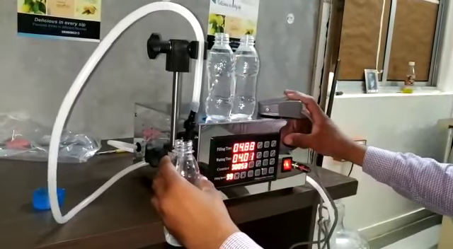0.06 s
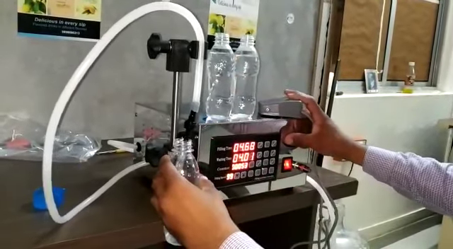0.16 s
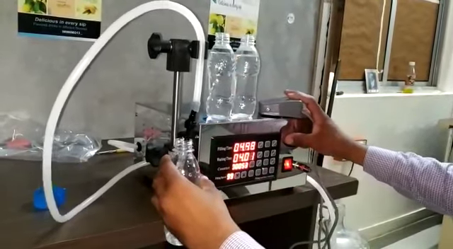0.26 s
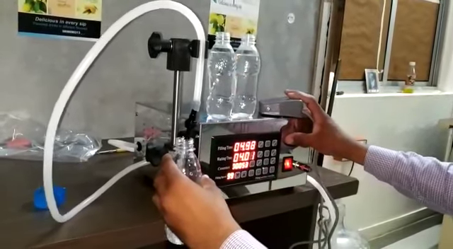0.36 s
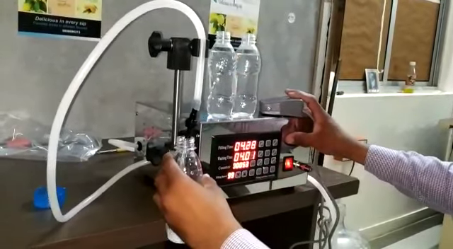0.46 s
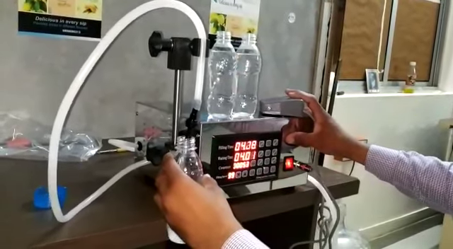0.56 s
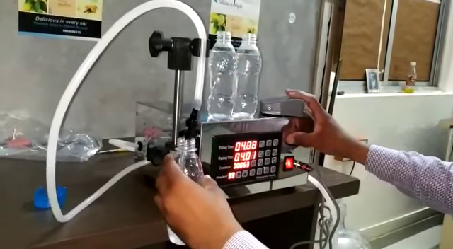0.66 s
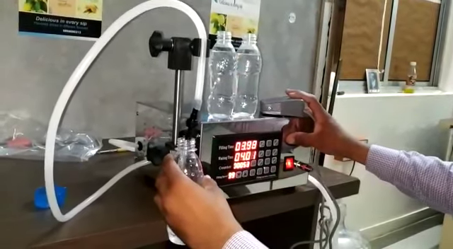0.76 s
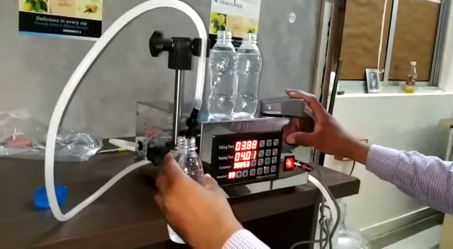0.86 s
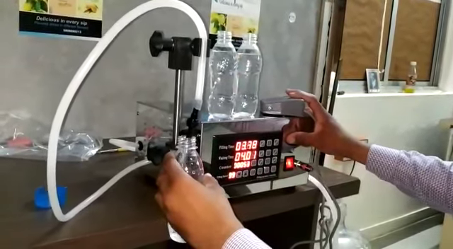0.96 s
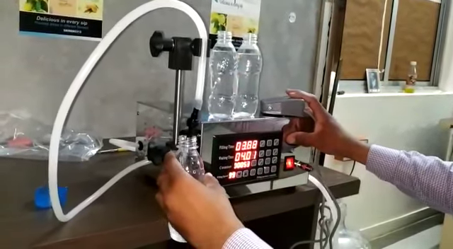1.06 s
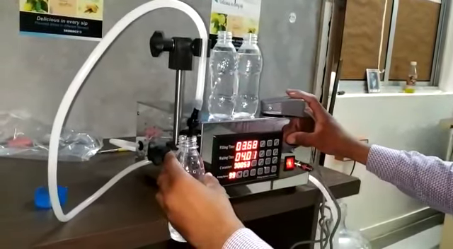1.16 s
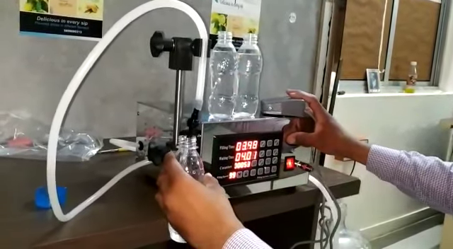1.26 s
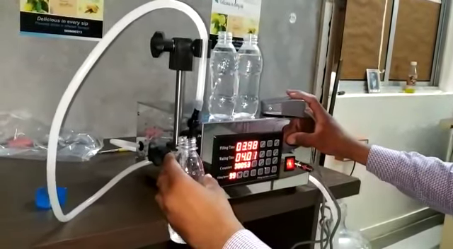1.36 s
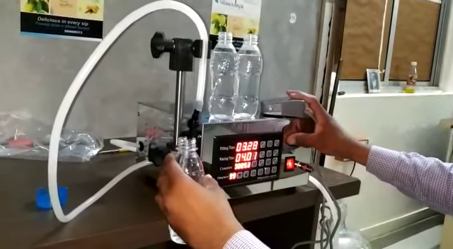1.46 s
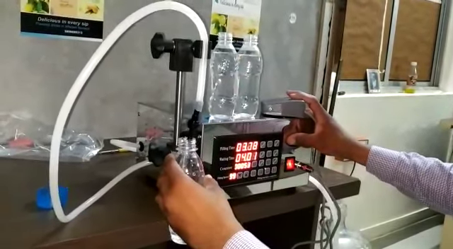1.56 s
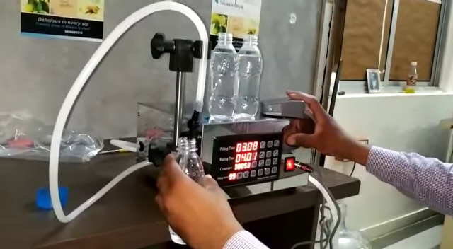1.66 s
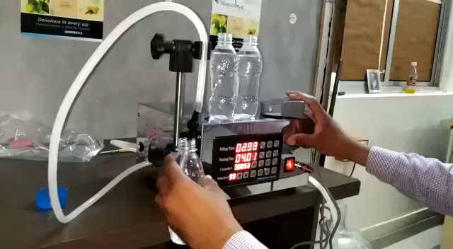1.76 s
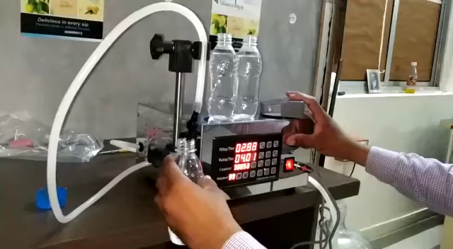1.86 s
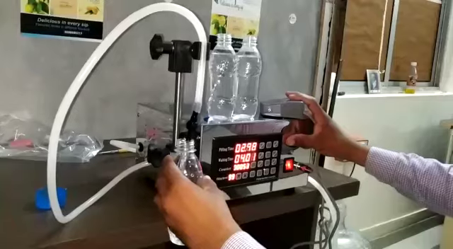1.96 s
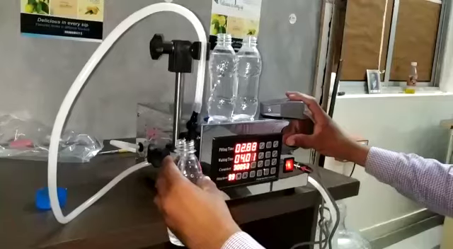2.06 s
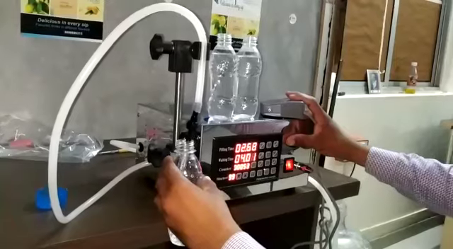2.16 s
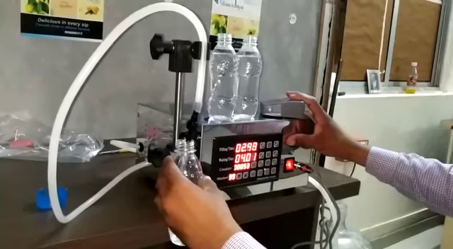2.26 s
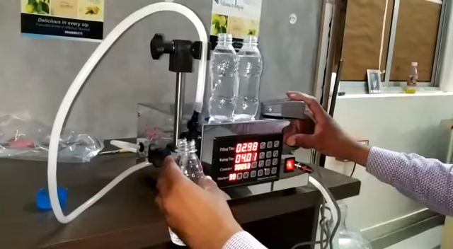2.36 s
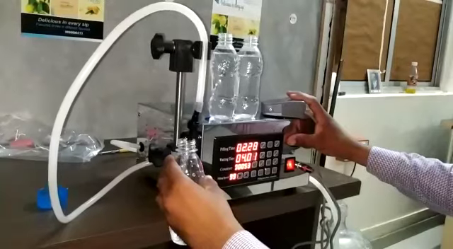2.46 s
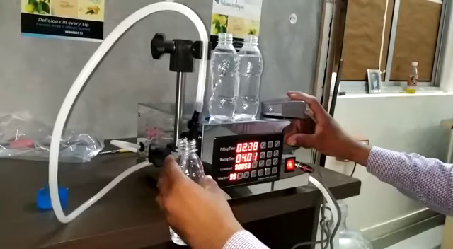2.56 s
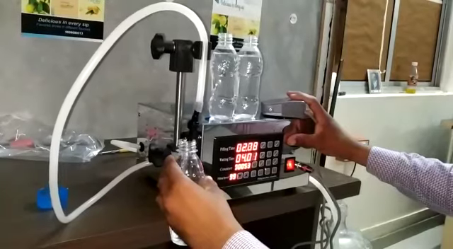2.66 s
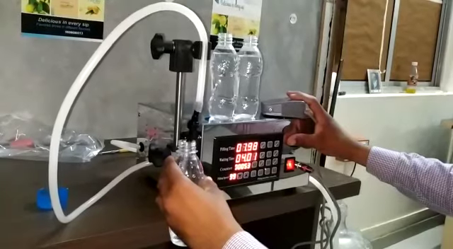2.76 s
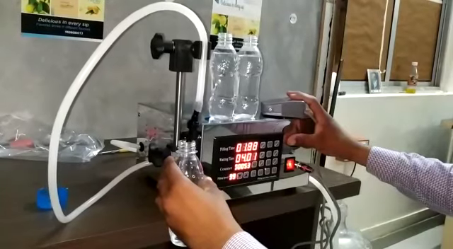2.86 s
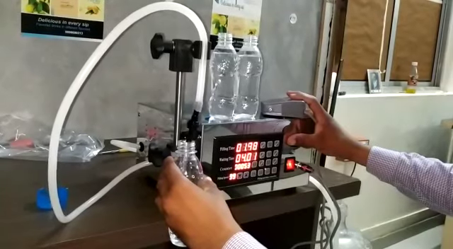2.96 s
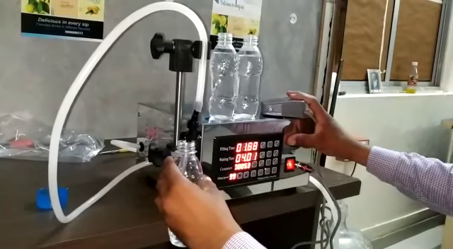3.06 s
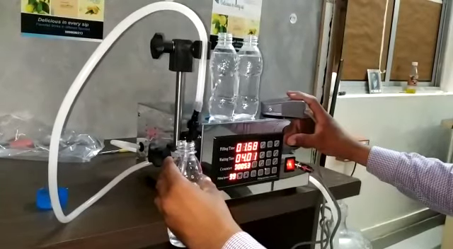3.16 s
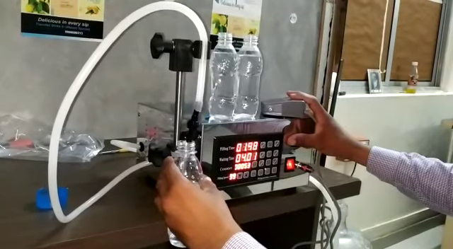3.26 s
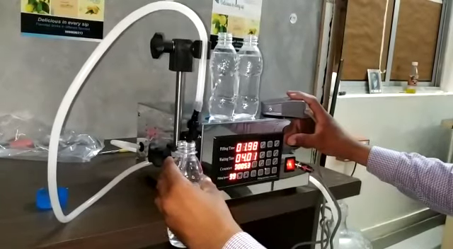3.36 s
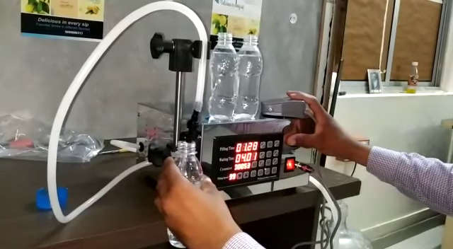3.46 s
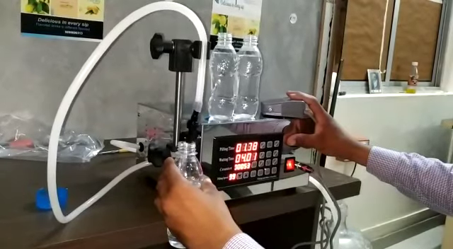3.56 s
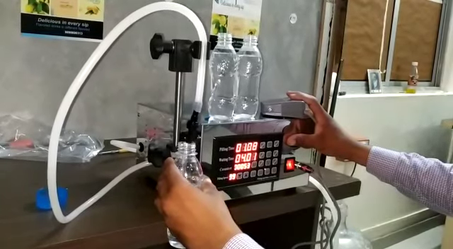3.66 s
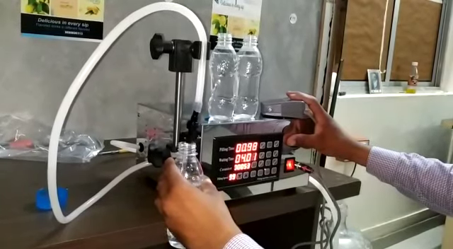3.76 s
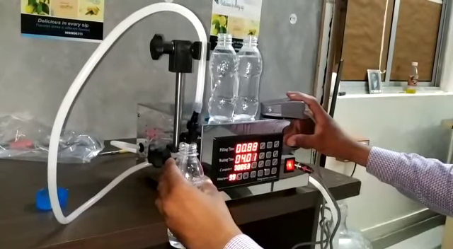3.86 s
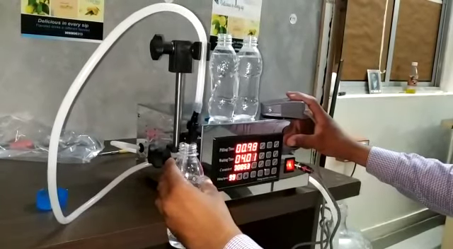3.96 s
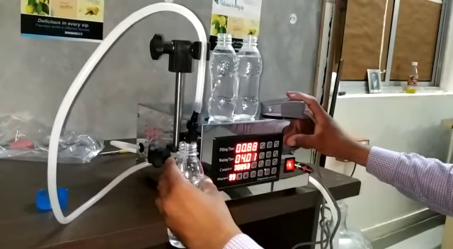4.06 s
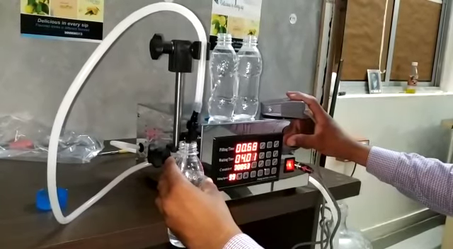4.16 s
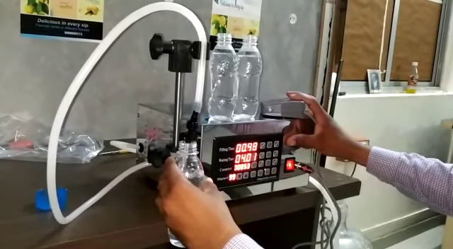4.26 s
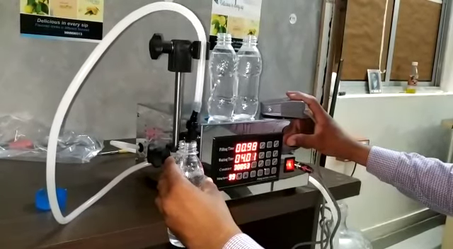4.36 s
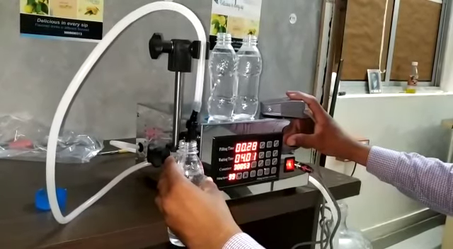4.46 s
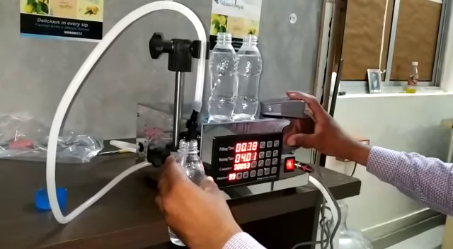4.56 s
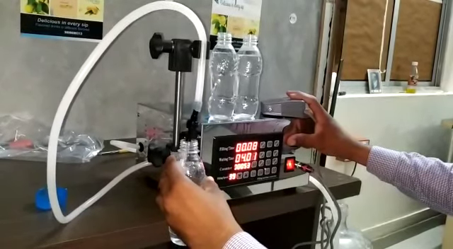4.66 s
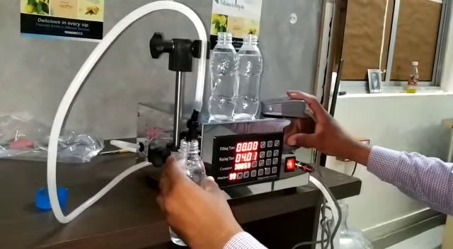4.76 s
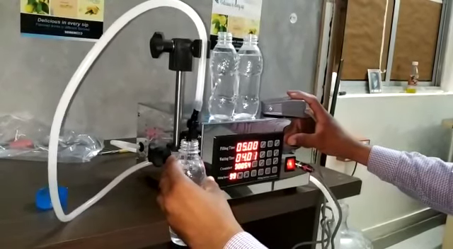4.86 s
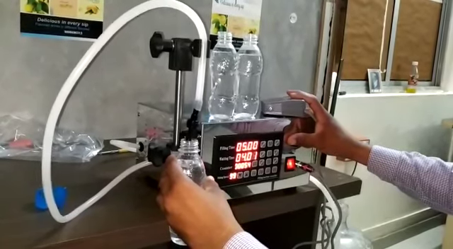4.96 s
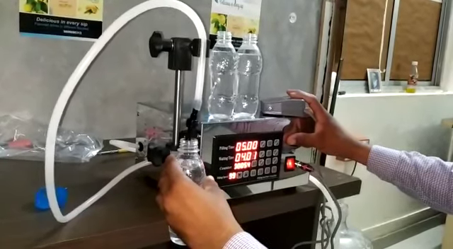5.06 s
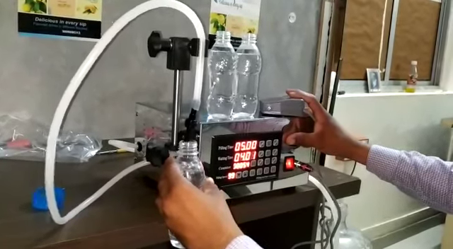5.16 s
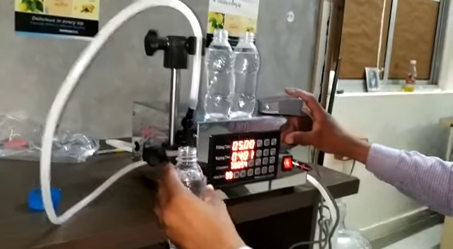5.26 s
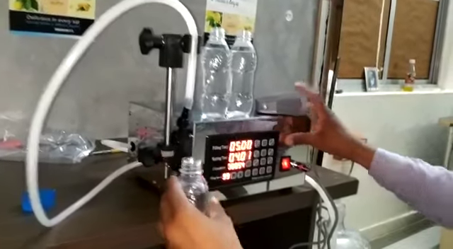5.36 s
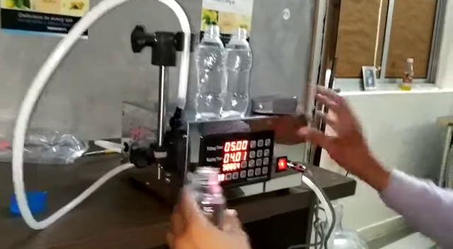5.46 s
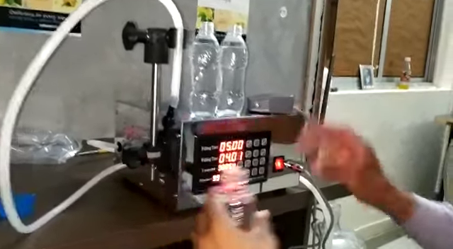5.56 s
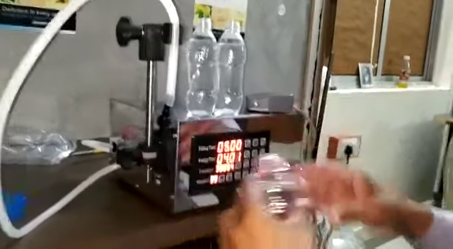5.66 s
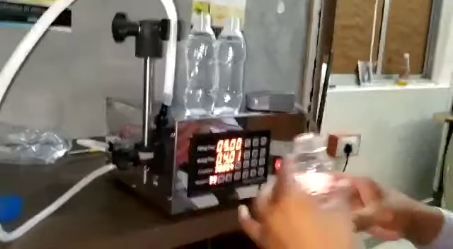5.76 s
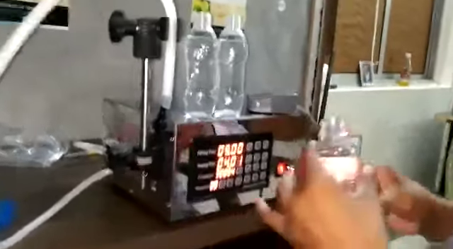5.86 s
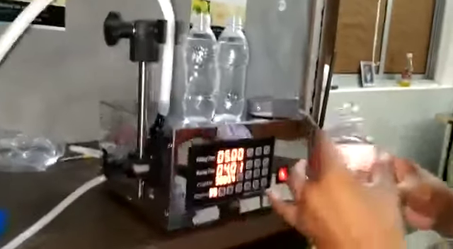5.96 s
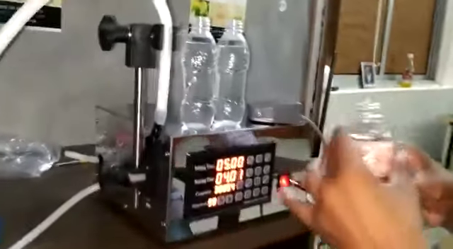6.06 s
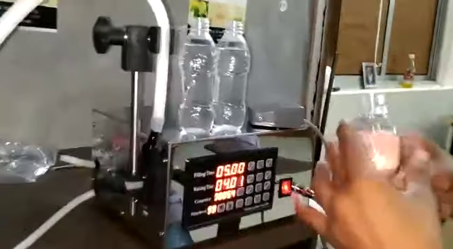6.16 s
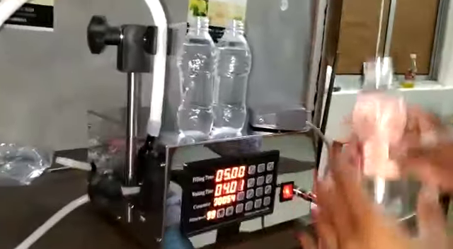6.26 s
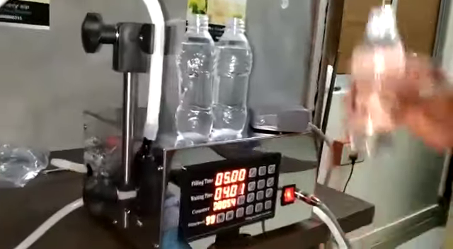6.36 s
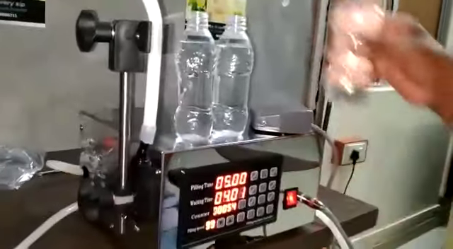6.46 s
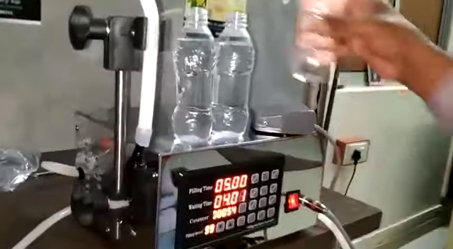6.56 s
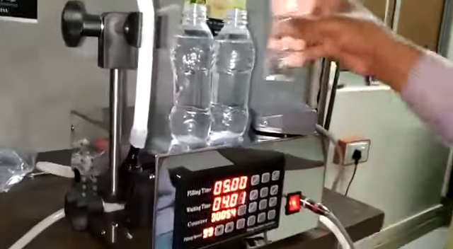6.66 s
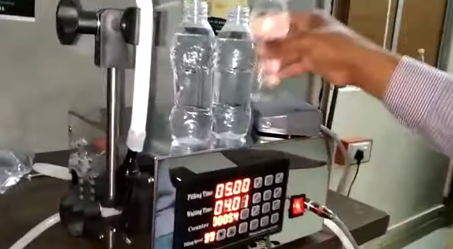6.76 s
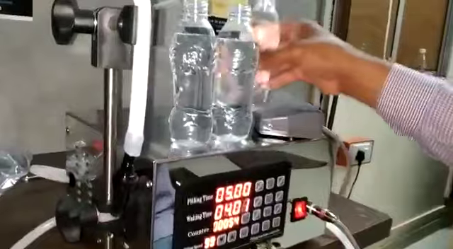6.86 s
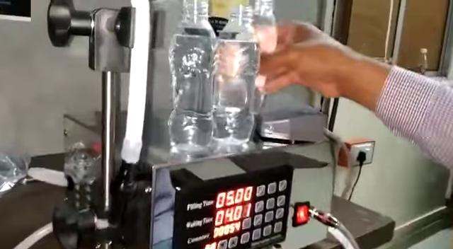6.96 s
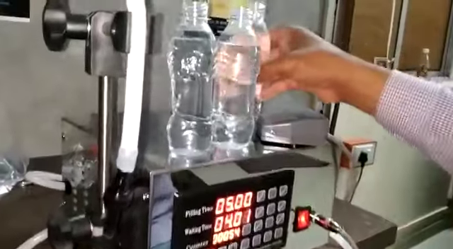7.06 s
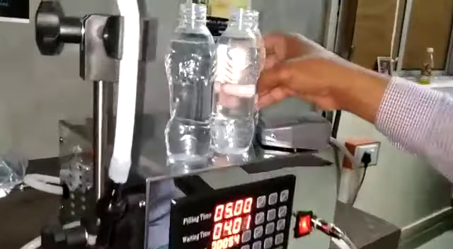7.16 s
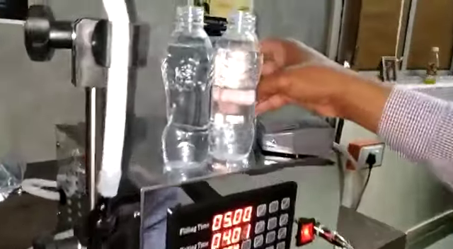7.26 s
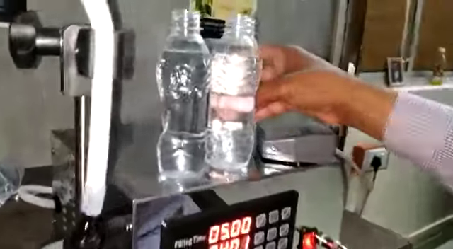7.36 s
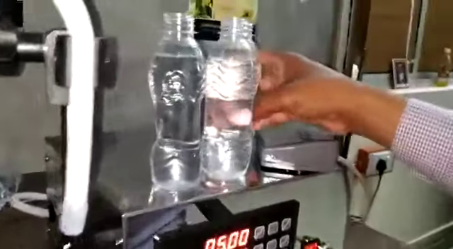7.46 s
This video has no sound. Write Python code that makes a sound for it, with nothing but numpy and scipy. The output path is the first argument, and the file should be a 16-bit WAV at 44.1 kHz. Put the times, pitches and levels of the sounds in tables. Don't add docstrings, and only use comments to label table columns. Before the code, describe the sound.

A small pump hums steadily with hissing spray as a plastic bottle fills, clicks off abruptly, then the bottle is set down with sharp knocks.

```python
import sys
import numpy as np
from scipy import signal
from scipy.fft import rfft, irfft
from scipy.io import wavfile
from scipy.ndimage import uniform_filter1d

SR = 44100
rng = np.random.default_rng(int(sys.argv[2]) if len(sys.argv) > 2 else 0)


def to_wav(s):
    ch = np.atleast_2d(s).T
    pcm = np.round(np.clip(ch, -1, 1) * 32767)
    wavfile.write(sys.argv[1], SR, pcm.astype(np.int16))


def invert_db(x):
    u = np.asarray(x, float) / 20
    return 10 ** u


N = 331632
TIME = np.arange(N) / SR

# time in seconds, speed in turns per second.
SHAFT_SPEED = [(0, 57.5), (.15, 58.9), (.5, 59.05), (1.2, 59.1), (1.6, 59.23), (2.8, 59.26), (3.4, 59.32),
               (4.8, 59.3), (5.3, 58.6)]
# order in cycles per turn, level in dB.
SHAFT_ORDERS = [(1, -17), (2, -11.5), (3, -4), (4, 2), (5, -12.5), (6, -7), (7, -20), (8, 0), (10, -22),
                (11, -19.5), (12, -15.5), (13, -19.5), (14, -14), (15, -17), (16, -16), (17, -24),
                (21, -27), (22, -22.5), (23, -26), (24, -21), (25, -23), (27, -21.5), (28, -28.5),
                (29, -20), (30, -31.5), (31, -21.5), (33, -28.5), (36, -22.5), (38, -22.5), (40, -26)]
# level in dB, shortfall at the start in dB,
# climb as the bottle fills in dB per s, release in seconds, decay after it in dB per s.
HUM_GROUPS = [
    (-47, 0, 0, 5.12, 150),
    (-37.5, 7, 0, 4.865, 62),
    (-42.5, 15.5, 1.05, 4.66, 76),
    (-40.5, 6, .2, 4.87, 200),
]
# centre in Hz, width in Hz, level in dB.
CASE_MODES = [(3320, 240, -1), (4350, 560, -5), (5800, 880, -5), (6780, 300, -7), (10800, 460, -15),
              (13000, 860, -12), (14900, 700, -8)]
# frequency in Hz, spectral level in dB.
SPRAY_COLOUR = [(1470, 3), (2500, 0), (2990, -5.5), (4360, -1.5), (5160, -3.5), (5800, -3), (7360, -2.5),
                (7530, -4.5), (8460, -3), (11000, -2.5), (12000, -4.5), (15000, -1.5), (15800, -7)]
# frequency in Hz, spectral level in dB.
CHURN_COLOUR = [(35, -49), (60, -7.5), (237, 3.5), (284, 4.5), (421, 1.5), (472, -16), (538, -2),
                (810, -1.5), (3000, -23.5), (3900, -40), (6600, -120)]
# time in seconds, depth in dB, half length in seconds.
WHINE_LULLS = [(.15, 4, .15), (2.1, 9, .3), (2.8, 2, .2)]
# time in seconds, frequency in Hz.
AIR_RESONANCE = [(1.6, 450), (2.7, 518), (3.2, 597), (3.52, 610), (3.72, 685), (4.2, 793), (4.36, 910),
                 (4.72, 1070), (4.92, 1430)]
# time in seconds, level in dB.
GULPS = [(2.03, -44), (2.47, -51), (2.9, -46), (3.17, -43), (3.32, -44), (3.52, -50), (3.72, -47),
         (3.9, -47), (4.15, -49), (4.34, -46)]
# start in seconds, peak in dB, pitch in Hz.
DROPLETS = [(0.1965, -33, 10800), (0.2284, -33, 10800), (0.278, -31, 11200), (0.3326, -36, 8700),
            (0.5382, -30.5, 10200), (0.6345, -36, 9090), (0.8185, -34, 11100), (0.8395, -30, 9300),
            (0.8729, -31, 9640), (0.9228, -30.5, 10800), (1.0046, -37, 11200), (1.2575, -32, 9690),
            (1.6237, -34, 9490), (1.6402, -26, 9800), (1.8213, -35, 11100), (2.2428, -32, 10800),
            (2.3516, -32, 10600), (2.5257, -35, 10800), (3.5059, -32, 10300), (3.7409, -36, 10300),
            (3.7898, -35, 13000), (3.9908, -34, 9850), (4.0572, -36, 9950), (4.2727, -35, 9480),
            (4.358, -33, 12400), (4.3914, -37, 11400), (4.789, -35, 10800), (4.8234, -36, 10600),
            (4.8569, -32, 10800), (4.8738, -32, 12000)]
# start in seconds, peak in dB, pitch in Hz.
SPLATS = [(0.4838, -31, 6780), (0.5127, -40, 5890), (0.5371, -31, 5200), (0.806, -31, 5270),
          (0.819, -32, 4160), (0.9073, -37, 6850), (0.9382, -32.5, 5930), (0.9766, -37, 6790),
          (1.1368, -30.5, 3550), (1.25, -30, 3870), (2.0906, -33, 6860), (2.144, -31, 4500),
          (2.5116, -41, 6660), (3.009, -37, 3310), (3.4231, -44, 4030), (3.6815, -38, 5750),
          (4.3584, -35, 5990), (4.8733, -37, 3630)]
# start in seconds, peak in dB, pitch in Hz, ring in seconds.
VALVE_RINGS = [(.305, -29, 2350, .005), (.402, -37.5, 5500, .004), (.413, -33, 4600, .004),
               (.428, -36, 5500, .004), (.446, -37, 5200, .004), (.522, -29, 1920, .004),
               (4.874, -34.5, 8400, .011), (4.8745, -35, 11300, .011), (4.899, -44, 11000, .006),
               (4.9772, -39, 4860, 0.0072), (4.9775, -52, 8450, .008), (6.9274, -26, 4310, 0.0028),
               (6.9276, -31, 5400, .0025), (6.9285, -35, 6940, .003), (7.3, -30, 1217, 0.014),
               (7.301, -30, 1680, .012), (7.302, -51, 3700, 0.0047), (7.304, -44, 6100, .005),
               (7.306, -37, 14800, .005), (7.33, -46, 14500, .012), (7.334, -47, 13200, .01)]
# start in seconds, crack in dB, body in dB, tilt in dB per octave.
KNOCKS = [(4.8733, -33, -36, 10), (4.8984, -36, -51, 10), (4.9759, -31, -38, 1), (4.982, -37, -40, 6),
          (5.8042, -36, -41, -8), (5.8492, -41, -38, 0.5), (6.3494, -46, -47, 3), (6.928, -14.5, -28, 4.5),
          (6.9492, -44, -32.5, 0.5), (7.1, -46, -56, 3), (7.2932, -27, -32.5, 8), (7.3057, -28, -30, 6),
          (7.316, -38, -32.5, 5), (7.326, -36, -37, 5), (7.3354, -39, -51, 0.5)]
# start in seconds, peak in dB, pitch in Hz, fall by 60 dB in seconds.
BUMPS = [(0.029, -28, 284, 0.4), (2.525, -23, 50, .06), (2.61, -24, 70.7, .08), (2.66, -24, 40, .1),
         (2.825, -25, 45, 0.1), (4.844, -28, 264.5, 0.3), (4.913, -32.5, 1450, 0.086),
         (4.95, -32, 294, 0.33), (5.388, -29, 45, .06), (5.457, -17, 45, .03), (6.023, -23, 50, 0.11),
         (6.905, -33, 402, 0.29), (7.2945, -23, 330, .025), (7.296, -25.5, 245, 0.15),
         (7.322, -30, 330, 0.09), (7.34, -28.5, 190, 0.17), (7.365, -24, 72.5, 0.24),
         (7.365, -25, 95, 0.035), (7.465, -26, 60, .06)]
# frequency in Hz, spectral level in dB.
ROOM_COLOUR = [(53, -38), (90, -6.5), (223, 0), (296, -3.5), (409, 2), (566, -8), (891, -5), (1060, -9),
               (2260, -14.5), (2990, -22.5), (6510, -32), (11400, -36), (15800, -43.5)]
# time in seconds, level in dB, half length in seconds.
PUFFS = [(0, -37.5, 0.11), (.38, -44, 0.12), (.84, -42, .04), (1.085, -47, 0.053), (1.51, -51, .04),
         (2.646, -39.5, 0.11), (2.836, -40, 0.034), (3.05, -47, .1), (3.75, -55, 0.077), (4.945, -50, .04),
         (5.227, -43, 0.038), (5.458, -40, 0.099), (6.02, -51, 0.068), (6.245, -46, 0.094),
         (6.44, -54, 0.017), (6.605, -49, 0.035), (7.045, -43, 0.16), (7.462, -46, 0.06)]
# frequency in Hz, spectral level in dB.
GUST_COLOUR = [(8, -14), (20, 1), (50, -5.5), (90, -6.5), (160, -14), (300, -15)]

SPIN_UP_S, SHUT_S = 0.13, 4.882
HUM_WAVER_DB = 0.97
FLOW_DB, FLOW_SAG_DB_PER_S = -43.5, .3
SHUT_DB_PER_S, DRIBBLE_DB, DRIBBLE_DB_PER_S = 259, -20, 40
CHURN_DB_PER_S = 67
WHINE_HZ, WHINE_DB, WHINE_WAVER_DB = 7783, -57, 0.5
AIR_DB, GULP_S = -55.5, 0.061
RATTLE_T60_S = .1
ROOM_DB = -40
DRAUGHT_DB, HANDLED_DB, HANDLED_S = -52.5, -49, 5.9
TURN_S, TURN_HALF_S, TURN_LIFT, TURN_HZ = 5.34, 0.68, 0.21, 3000
EDGE_HZ = 15740


def pump():
    angle = 2 * np.pi * np.cumsum(curves(SHAFT_SPEED)[0]) / SR
    throb = 1 + 0.14 * np.cos(angle) + .08 * np.cos(4 * angle)
    churn_db = FLOW_DB - 1.2 - CHURN_DB_PER_S * after(SHUT_S)
    churn = invert_db(churn_db) * noise(CHURN_COLOUR, 1.0, size=2048)
    jet = invert_db(-1.4) * spray(throb) + invert_db(-7.0) * chatter(angle)
    return shaft_hum(angle) + stream() * jet + churn


def shaft_hum(angle):
    lazy = np.clip(1 - TIME / SPIN_UP_S, 0, 1)
    groups = []
    for db, short_db, climb_db, release_s, dies_db in HUM_GROUPS:
        group_db = db - short_db * lazy + climb_db * TIME - dies_db * after(release_s)
        groups.append(group_db + HUM_WAVER_DB * drift(4.8))
    two_db, four_db, eight_db, upper_db = groups
    hum = np.zeros(N)
    for k, db in SHAFT_ORDERS:
        if k < 2.5:
            lead_db = two_db + 11
        elif k < 5.5:
            lead_db = four_db
        elif k < 8.5:
            lead_db = eight_db + 2
        else:
            lead_db = upper_db + 2
        lag = 2.3 + np.pi * (k % 2) * (k > 4) + .04 * k * rng.uniform(-3, 3)
        waver_db = 1.54 * (k % 4 > 0) * drift(14)
        hum += np.sqrt(2) * invert_db(lead_db + db + waver_db) * np.cos(k * angle - lag)
    return hum


def chatter(angle):
    orders = np.arange(41, 260)
    lift = 0.15
    for hz, width, db in CASE_MODES:
        lift = lift + invert_db(db) / (1 + (2 * (orders * SHAFT_SPEED[5][1] - hz) / width) ** 2)
    heights = lift * invert_db(2.5 * np.clip(rng.standard_normal(len(orders)), -2, 1.2))
    one_turn = np.linspace(0, 2 * np.pi, 4096)
    phases = rng.uniform(0, 2 * np.pi, (len(orders), 1))
    rattle = heights @ np.cos(orders[:, None] * one_turn + phases)
    return np.interp(angle % (2 * np.pi), one_turn, evened(rattle))


def spray(throb):
    hiss = throb * noise(SPRAY_COLOUR, 0.91, size=256) * invert_db(0.27 * drift(30))
    ringing = sum(resonate(hiss, hz, width) for hz, width, db in CASE_MODES)
    hiss = evened(hiss + 0.11 * ringing)
    fizz = hiss - signal.lfilter(*signal.butter(2, 9000, fs=SR), hiss)
    return hiss + 0.14 * drift(43) * fizz


def stream():
    dribble = invert_db(DRIBBLE_DB - DRIBBLE_DB_PER_S * after(SHUT_S)) * (TIME > SHUT_S)
    shut = invert_db(-SHUT_DB_PER_S * after(SHUT_S)) + dribble
    return invert_db(FLOW_DB - FLOW_SAG_DB_PER_S * TIME) * np.minimum(shut, 1)


def whine():
    lulls_db = sum(depth_db * hump(s, half_s) for s, depth_db, half_s in WHINE_LULLS)
    db = WHINE_DB + WHINE_WAVER_DB * drift(3) - lulls_db
    cut_db = SHUT_DB_PER_S * after(SHUT_S - .045)
    return np.sqrt(2) * invert_db(db - cut_db) * np.sin(2 * np.pi * WHINE_HZ * TIME)


def bottle_air():
    hz = curves(AIR_RESONANCE)[0] * (1 + 0.029 * drift(9.6))
    ring = resonate(resonate(rng.standard_normal(N), hz, 40), hz, 71)
    steady = ring / np.sqrt(abs(uniform_filter1d(ring ** 2, 2500)) + 1e-12)
    fade_in = np.minimum(after(AIR_RESONANCE[0][0]), 1)
    hum = invert_db(AIR_DB - SHUT_DB_PER_S * after(SHUT_S)) * fade_in
    gulps = sum(invert_db(db) * hump(s, GULP_S) for s, db in GULPS)
    return (hum + gulps) * steady


def ticks(rows, ring_s=None, wet=0.48):
    out, t = np.zeros(N), np.arange(1500) / SR
    for s, db, hz, *own in rows:
        fringe = evened(resonate(rng.standard_normal(len(t)), hz, 0.25 * hz))
        ring = (1.05 - wet) * np.sin(2 * np.pi * hz * t) + wet * fringe
        envelope = np.exp(-(t / (ring_s or own[0])) ** 2) * np.minimum(t / 0.00021, 1)
        add(out, s, invert_db(db - 3.5) * ring * envelope)
    return out


def knocks():
    out, t = np.zeros(N), np.arange(8000) / SR
    hz = np.fft.rfftfreq(len(t), 1 / SR) + 1
    for s, crack_db, body_db, tilt_db in KNOCKS:
        white = rfft(rng.standard_normal((2, len(t))))
        tilt = invert_db(tilt_db * np.log2(np.minimum(hz, 13000) / 8000))
        crack = evened(irfft(white[0] * tilt / (1 + (3000 / hz) ** 4)))
        body = evened(irfft(white[1] / (1 + (250 / hz) ** 4) / (1 + (hz / 1800) ** 2)))
        envelope = np.exp(-t / 0.0012) + 0.29 * invert_db(-60 * t / RATTLE_T60_S)
        thud = invert_db(body_db - 60 * t / 0.045) * np.minimum(t / 0.0025, 1) * body
        attack = np.minimum(t / 0.00035, 1) ** 2
        add(out, s, invert_db(crack_db - 9) * attack * envelope * crack + thud)
    return out


def bumps():
    out, t = np.zeros(N), np.arange(9000) / SR
    rise = 1 - np.exp(-t / 0.0018)
    for s, db, hz, t60 in BUMPS:
        add(out, s, invert_db(db - 60 * t / t60) * rise * np.sin(2 * np.pi * hz * t + 0.35))
    return out


def room():
    wash = invert_db(ROOM_DB + 0.76 + 0.1 * drift(2.8)) * noise(ROOM_COLOUR, 0.91, size=2048)
    treble = signal.lfilter(*signal.butter(1, TURN_HZ, "high", fs=SR), wash)
    wash = wash + TURN_LIFT * hump(TURN_S, TURN_HALF_S) * treble
    air = invert_db(DRAUGHT_DB) + invert_db(HANDLED_DB) * np.minimum(after(HANDLED_S) / .15, 1)
    air = air + sum(invert_db(db) * hump(s, half_s) for s, db, half_s in PUFFS)
    return wash + air * invert_db(1.3 * drift(18.0)) * noise(GUST_COLOUR, 0.67, size=4096)


def echoes(sharp):
    tail = rng.standard_normal(9000) * invert_db(-60 * np.arange(9000) / SR / .45)
    tail = signal.lfilter([1], [1, -.4], tail)
    return invert_db(-8) * signal.oaconvolve(sharp, tail / np.linalg.norm(tail))[:N]


def noise(colour, patchy_db, size):
    hz = np.fft.rfftfreq(size, 1 / SR)
    f, db = np.transpose(colour)
    a, b, patches = rng.standard_normal((4 * N // size + 5, len(hz), 3)).T
    patches = uniform_filter1d(patches, size // 100, 0)
    patches = evened(uniform_filter1d(patches, 9000 // size, 1))
    shape = np.interp(np.log(hz + 1), np.log(f + 1), db, left=-90, right=-90)
    z = (a + 1j * b) * invert_db(shape[:, None] + patchy_db * patches)
    return evened(signal.istft(z, nperseg=size, noverlap=3 * size // 4)[1][:N])


def resonate(x, hz, width):
    turn = np.exp(2j * np.pi * np.cumsum(hz * np.ones(len(x))) / SR)
    r = np.exp(-np.pi * width / SR)
    return 2 * (turn * signal.lfilter([1 - r], [1, -r], x / turn + 1e-18)).real


def drift(hz):
    knots = np.arange(0, TIME[-1] + 1, .002)
    chance = uniform_filter1d(rng.standard_normal(len(knots)), max(int(125 / hz), 1))
    slow = signal.lfilter([1], [1, -np.exp(-2 * np.pi * hz * knots[1])], chance)
    return evened(np.interp(TIME, knots, slow))


def evened(x):
    return x / np.sqrt(np.mean(x ** 2) + 1e-20)


def curves(rows):
    s, *columns = np.transpose(rows)
    return [np.interp(TIME, s, c) for c in columns]


def after(s):
    return np.maximum(TIME - s, 0)


def hump(s, half_s):
    return np.exp(-((TIME - s) / half_s) ** 2)


def add(mix, s, sound):
    part = mix[round(s * SR):][:len(sound)]
    part += sound[:len(part)]


def scene():
    sharp = ticks(DROPLETS, 0.003) + ticks(SPLATS, 0.0029) + ticks(VALVE_RINGS, wet=.28) + knocks()
    sharp = sharp + echoes(sharp)
    return (pump() + whine() + bottle_air() + sharp + bumps() + room())[None]


def top_cut(x):
    return signal.sosfilt(signal.butter(12, 16690, fs=SR, output="sos"), x)


def record(dry):
    edge = signal.firwin(1023, EDGE_HZ, window=("kaiser", 10), fs=SR)
    mix = signal.oaconvolve(dry, edge[None], "same")
    return top_cut(mix)


dry = scene()
out = record(dry)
to_wav(out)
```